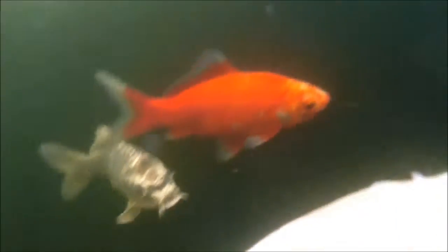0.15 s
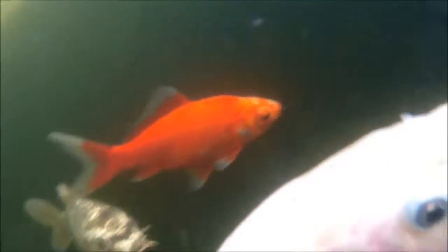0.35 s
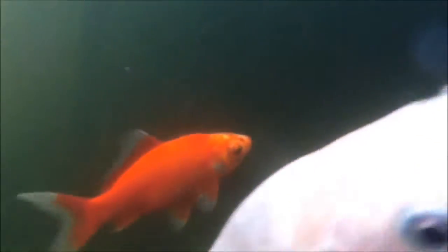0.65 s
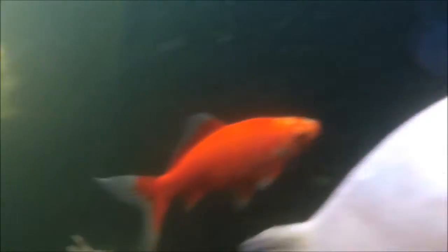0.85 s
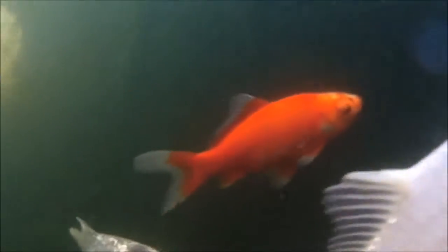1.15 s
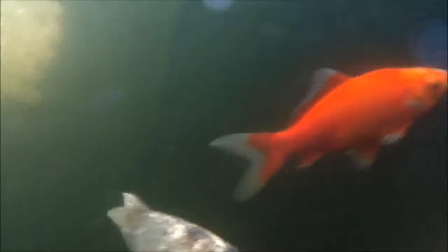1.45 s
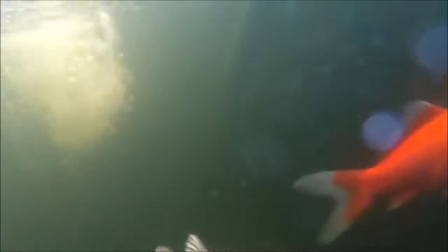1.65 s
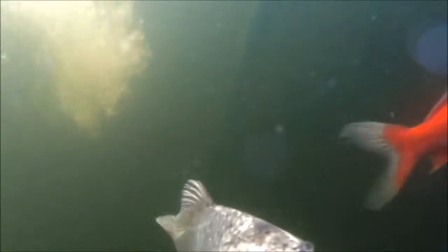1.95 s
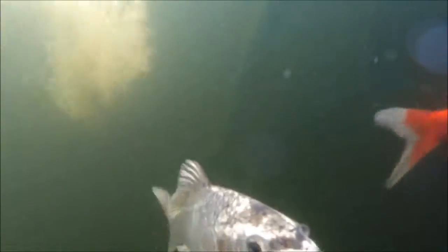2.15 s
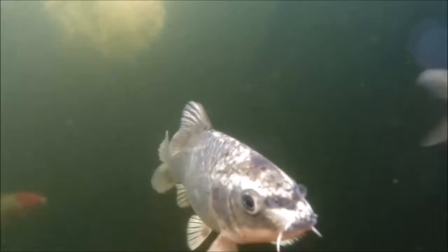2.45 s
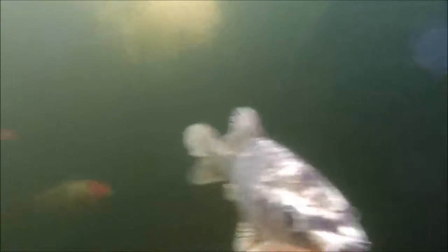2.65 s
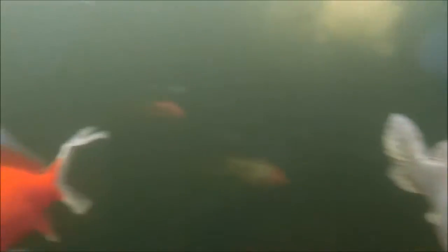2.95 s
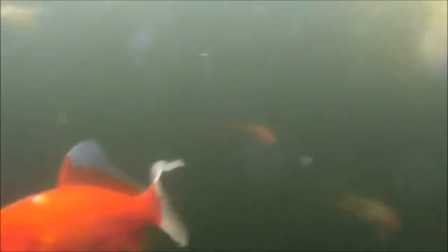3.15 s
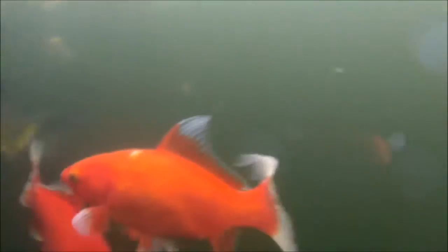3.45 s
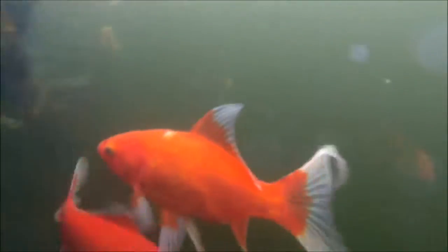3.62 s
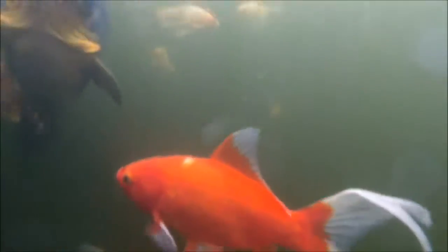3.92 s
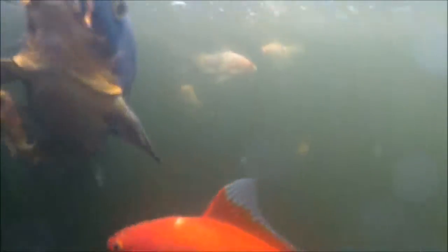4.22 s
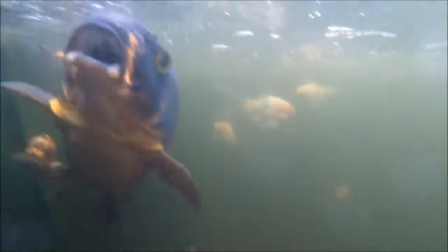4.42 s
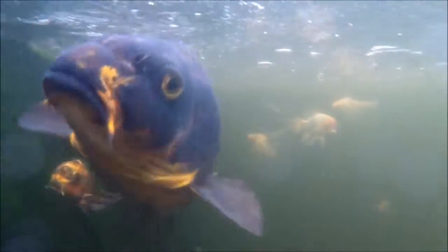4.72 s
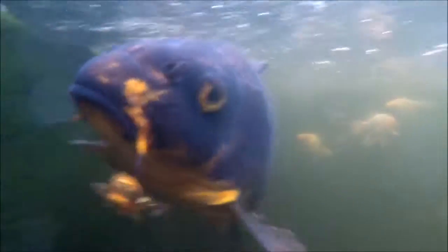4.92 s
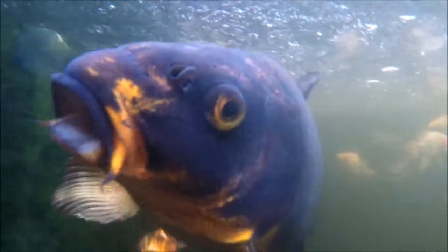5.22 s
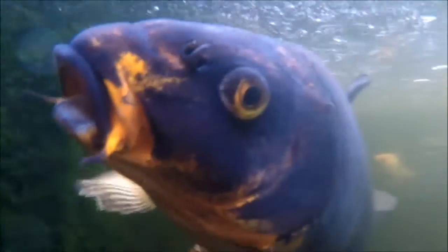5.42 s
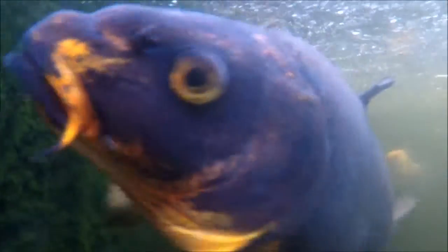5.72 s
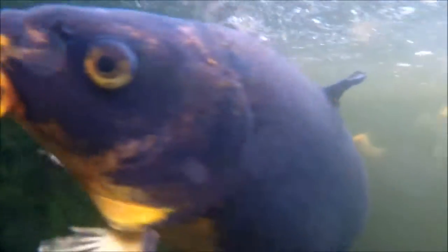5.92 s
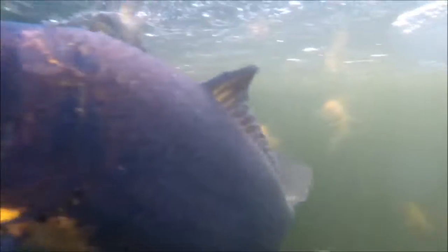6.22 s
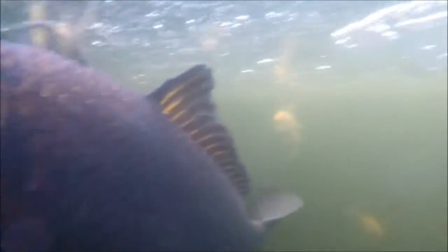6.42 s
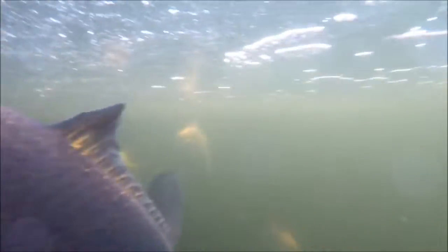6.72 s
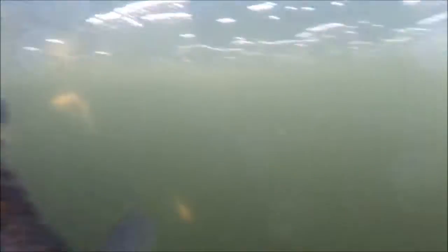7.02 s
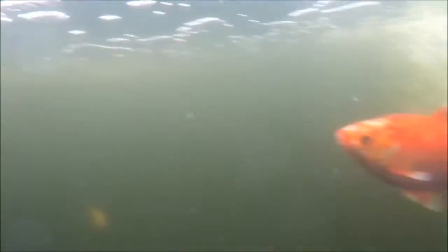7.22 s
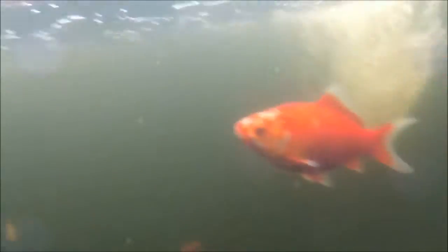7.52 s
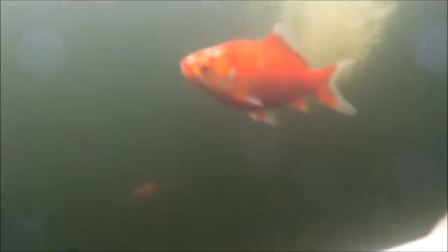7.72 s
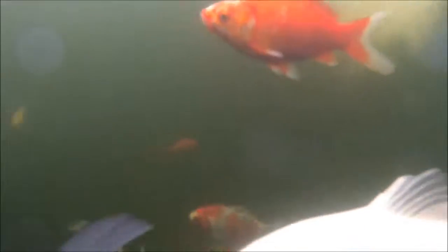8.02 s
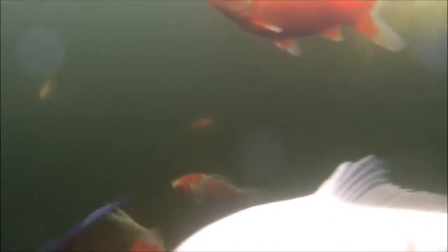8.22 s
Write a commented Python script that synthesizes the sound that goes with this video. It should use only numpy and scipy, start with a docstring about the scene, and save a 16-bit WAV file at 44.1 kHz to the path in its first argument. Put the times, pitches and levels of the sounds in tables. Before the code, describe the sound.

Under a garden pond's surface, a microphone sealed in a drifting waterproof case picks up deep, uneven water rumble and a steady low pump hum. Faint glassy trickling, fizz and gurgle grow toward the middle. Dull knocks, low glugs, tiny ticks and single bubble pings come irregularly. Around seven seconds the case is shoved, rubbed and bumped, with a lesser scrape soon after, then it calms.

```python
"""Water rumbles on a waterproof housing over a low pump hum and hiss, with trickle, fizz, gurgle and crackle.
The place is under the surface of a garden pond; the camera's one microphone drifts inside the housing.
Shaped noise makes the rumble and hiss, sines the hum and whine, random impulses through resonators the inflow.
Close by, damped sines make knocks, low glugs and bubble pings; noise bursts make ticks and rubs; a few blows
bump the case."""
import sys
import numpy as np
from scipy import signal
from scipy.fft import rfft, irfft
from scipy.io import wavfile
from scipy.ndimage import uniform_filter1d

SR = 44100
rng = np.random.default_rng(int(sys.argv[2]) if len(sys.argv) > 2 else 0)


def inscribe(sig):
    """Save sig as 16-bit PCM at rate SR to the path in sys.argv[1].

    A 1-D sig is mono; a 2-D sig holds one channel per row.
    Samples are clipped to [-1, 1] before scaling.
    """
    pcm = np.round(np.clip(np.atleast_2d(sig).T, -1, 1) * 32767)
    wavfile.write(sys.argv[1], SR, pcm.astype(np.int16))


N = 368676

# The pump hum as the camera drifts. Each row: time in seconds, level in dB before flutter.
PUMP_LEVEL = [(0, -40), (0.75, -43), (1.1, -41), (2.3, -37), (3.9, -38.0), (5.0, -40.5), (6.6, -38.5),
              (8.36, -40)]
PUMP_HZ, PUMP_WANDER_HZ, PUMP_FLUTTER_DB = 122.47, 0.094, 0.47

# How hard moving water pushes on the case. Each row: time in seconds, push in dB.
WATER_PUSH = [(0, -29.5), (0.4, -33), (0.85, -25.5), (1.15, -33.5), (1.5, -30), (2.15, -35.5), (2.4, -29.5),
              (2.85, -34), (4.4, -35.5), (4.75, -39), (5.3, -36.5), (6.8, -34), (7.15, -29.5),
              (7.45, -35.5), (7.7, -31), (8.0, -35.5), (8.36, -39)]
# Colour of the rumble. Each row: frequency in Hz, level in dB.
RUMBLE_COLOUR = [(10, -4.5), (22, 8.5), (35, 4), (55, -3), (80, -10.5), (110, -11.5), (170, -21),
                 (260, -48), (500, -77)]
# The case shoved through the water. Each row: middle in seconds, length in seconds, level in dB, pitch in Hz.
SHOVES = [(0.885, 0.18, -26, 38), (5.423, 0.037, -27, 60), (7.227, 0.29, -22, 23),
          (7.258, 0.027, -13, 51.7), (7.637, 0.069, -26.5, 44.5)]
EDDY_DB, EDDY_LUMPS_DB = -2, 1.63   # rumble relative to the push; spread of its random swing

# Inflow, stronger as the camera nears it; only differences count. Each row: time in seconds, strength in dB.
INFLOW_STRENGTH = [(0, -56.5), (0.8, -61), (1.8, -51.5), (3.0, -50.5), (5.0, -49.0), (6.2, -48.0),
                   (7.0, -49), (7.5, -50.5), (8.36, -56)]
# How hard the bubbles churn. Each row: time in seconds, churn in dB.
CHURN_STRENGTH = [(0, -54.5), (0.8, -57), (2.6, -53.5), (3.1, -51), (3.7, -51.5), (4.2, -48), (4.9, -51),
                  (7.0, -50.5), (8.36, -56.0)]
# Housing resonances. Each row: frequency in Hz, width in Hz, relative level in dB.
HOUSING_MODES = [(1517, 57, -2.5), (1809, 32, -5), (1793, 91, -15), (1900, 19, -11), (2330, 10.3, 7.5),
                 (2474, 29, -8.5), (2696, 60, -4), (3426, 174, -14), (3918, 43, -11)]
# Bubble splatter close to the inflow. Each row: frequency in Hz, level in dB.
SPLATTER_COLOUR = [(1480, -6.5), (1700, 3), (1850, 1), (2100, -0.5), (2350, 9.5), (2600, -3.5), (2820, 4)]
TRICKLE_DB, TRICKLE_FOLLOWS = -46.5, 1.42   # base level at the nearest point; dB per dB of inflow
SPLATTER_RANGE_DB = 10   # splatter is heard within this much of the nearest point
FAR_TILT_DB_PER_OCTAVE = 3.5   # the trickle thins with distance

# Bubble swarms. Each row: frequency in Hz, level in dB.
FIZZ_COLOUR = [(2500, 16.5), (3300, -26.5), (4400, -6), (5500, 2), (6500, -2.5), (7200, -8.5), (9000, -6),
               (10500, -26), (13000, -14), (15000, -31)]
# The finest fizz. Each row: frequency in Hz, level in dB.
FINE_FIZZ_COLOUR = [(7200, -1), (7800, 1), (8700, -9), (10200, -7)]
FIZZ_DB, FIZZ_FOLLOWS = -58.5, 0.79   # base level at the strongest churn; dB per dB of churn
FINE_FIZZ_DB, FINE_FIZZ_FADE_DB_PER_S = -70.5, 1.3   # level at the start; fade as the camera drifts on

# Large bubbles. Each row: frequency in Hz, level in dB.
GURGLE_COLOUR = [(190, 0.5), (280, 1.5), (400, -2.5), (550, -5), (800, -10), (1200, -51)]
GURGLE_DB, GULP_DB, GULPS_PER_S = -5, -9, 14   # levels relative to the churn

# Surface crackle. Each row: band centre in Hz, relative level in dB.
CRACKLE_BANDS = [(4200, -1.5), (5800, -4.0), (8000, -2.0), (11000, -11.5)]

# Colour of the background hiss. Each row: frequency in Hz, level in dB.
HISS_COLOUR = [(94, -62), (160, -8), (205, 0), (305, -45), (349, -9.5), (438, -13), (885, -13.5),
               (1660, -16.5), (2660, -10.5), (2930, -18), (3340, -17.5), (9690, -31), (15000, -43)]
# Faint electrical whine. Each row: frequency in Hz, rms level in dB.
WHINE_TONES = [(9450, -77.5), (9500, -81.5)]

# Knocks on the case and low glugs of big bubbles. Each row: start in seconds, peak in dB before housing ring,
# pitch in Hz.
KNOCKS_AND_GLUGS = [(0.039, -42.5, 720), (0.4735, -29.5, 289), (0.479, -29.5, 199), (1.066, -43, 290),
                    (1.3306, -38, 810), (1.506, -33.5, 725), (1.8472, -22, 834), (2.067, -26.5, 360),
                    (2.509, -40, 240), (2.76, -42, 356), (3.087, -38, 280), (3.33, -27.5, 673),
                    (4.053, -38, 380), (4.114, -41, 308), (4.170, -38.5, 407), (4.238, -38, 283),
                    (4.577, -31, 394), (4.678, -34.5, 287), (5.226, -30, 288), (5.298, -40, 390),
                    (5.628, -35.5, 260), (6.21, -37, 318), (7.0386, -29, 320)]
KNOCK_CYCLES, KNOCK_ATTACK_S, KNOCK_RING_DB = 11.4, 0.00035, 18.5   # cycles to fall 60 dB; onset; housing ring

# Rubs on the case, levels before scaling by length. Each row: start in seconds, length in seconds,
# wall ringing in dB, rasp in dB, squeak in Hz.
RUBS = [(0.065, 0.047, -56, -43.5, 970), (0.451, 0.056, -51, -49, 1900), (1.068, 0.022, -68, -54.5, 1020),
        (3.396, 0.098, -73, -54.5, 1000), (6.812, 0.05, -52.5, -52, 1180), (6.992, 0.037, -55, -53, 2410),
        (7.032, 0.027, -56, -55, 730), (7.182, 0.079, -35.5, -38.5, 2330), (7.187, 0.041, -31, -38.5, 940),
        (7.627, 0.021, -37, -44, 1390), (7.647, 0.067, -36, -45.5, 3400), (7.700, 0.011, -29, -41, 1260),
        (8.093, 0.028, -47.5, -46.5, 1810)]
# Colour of the rasp. Each row: frequency in Hz, level in dB.
RASP_COLOUR = [(100, -8), (200, 0), (700, 0), (1200, -4), (1600, -7), (2400, -4), (2750, -7), (3100, -16),
               (4300, -18), (5000, -30), (12000, -48)]
# Low resonances of the case walls. Each row: frequency in Hz, width in Hz, relative level in dB.
WALL_MODES = [(186, 200, -4.5), (297, 22, 10.5), (384, 21, 6.5), (446, 58, 5.5), (530, 10.6, 4.5),
              (718, 25, -5)]
SQUEAK_SHARE, SQUEAK_FALL_PER_OCTAVE = 0.66, 0.27   # at 1 kHz; higher squeaks stand out less

# Sharp ticks, some of them the click of a knock. Each row: start in seconds, peak in dB, centre in Hz.
TICKS = [(0.776, -40, 2290), (0.7767, -43, 5000), (.990, -47, 9400), (1.122, -44, 8000),
         (1.693, -42.5, 9900), (1.847, -37, 2210), (2.086, -38, 2500), (2.1443, -39.5, 900),
         (2.145, -35, 2320), (2.173, -43, 8000), (3.263, -40, 5740), (3.3299, -35.5, 2540),
         (4.323, -46, 7560), (4.655, -38.5, 1710), (5.053, -39.5, 7650), (5.831, -43, 10800),
         (7.077, -38.5, 7000), (7.1466, -30.5, 6400)]

# Single bubbles near the case. Each row: start in seconds, peak in dB, pitch in Hz.
BUBBLES = [(1.625, -47.5, 2120), (1.808, -46, 6400), (2.084, -45, 3530), (2.098, -43, 1520),
           (2.229, -49, 1547), (2.447, -47, 3910), (2.722, -50, 697), (2.955, -51, 2970), (2.970, -46, 484),
           (3.022, -46.5, 4120), (3.0765, -40.5, 2326), (3.455, -43, 2330), (3.485, -42, 2330),
           (3.68, -31.5, 2320), (4.654, -47, 2340), (7.246, -28.5, 2394), (7.310, -46.5, 3560)]
BUBBLE_CYCLES = 170   # cycles to fall 60 dB

# The case bumps while it is rubbed. Each row: start in seconds, peak in dB, pitch in Hz.
BUMPS = [(7.1926, -26.5, 390), (7.633, -25, 420), (7.692, -23, 485), (7.704, -30, 330)]
BUMP_WIDTH_HZ = 220   # spread of a blow round its pitch

CUTOFF_HZ = 15250


def from_db(db):
    """Decibels to gain."""
    return 10 ** (np.asarray(db) / 20)


def rms_one(x):
    """Scale to unit rms."""
    return x / np.sqrt(np.mean(x ** 2) + 1e-20)


def in_time(rows):
    """Each column of a curve at every sample."""
    s, *columns = np.transpose(rows)
    return [np.interp(np.arange(N) / SR, s, column) for column in columns]


def at_hz(points, hz):
    """Gain of a spectrum at given frequencies, interpolated along log frequency."""
    known_hz, db = np.transpose(points)
    return from_db(np.interp(np.log(hz + 1e-3), np.log(known_hz), db))


def drift(rate):
    """Slow random wander of rms 1; a higher rate in Hz wanders faster."""
    # made at one fortieth of the sample rate, then interpolated
    r = np.exp(-80 * np.pi * rate / SR)
    chance = rng.standard_normal(N // 40 + 2002)
    slow = signal.lfilter([1], [1, -2 * r, r * r], chance)[2000:]
    return np.interp(np.arange(N) / 40, np.arange(len(slow)), rms_one(slow))


def coloured(x, spectrum):
    """Give a sound a colour; rms 1."""
    gain = at_hz(spectrum, np.fft.rfftfreq(len(x), 1 / SR))
    return rms_one(irfft(rfft(x) * gain, len(x)))


def noise(spectrum):
    """Steady noise of a given colour, rms 1."""
    return coloured(rng.standard_normal(N), spectrum)


def resonance(x, hz, width):
    """Two-pole band-pass with gain 1 on top."""
    r = np.exp(-np.pi * width / SR)
    w = 2 * np.pi * min(hz, .45 * SR) / SR
    return signal.lfilter(np.array([1, 0, -1]) * (1 - r * r) / 2, [1, -2 * r * np.cos(w), r * r], x + 1e-18)


def body(x, modes):
    """Resonances in parallel, with alternating sign."""
    return sum((-1) ** k * from_db(db) * resonance(x, hz, width) for k, (hz, width, db) in enumerate(modes))


def low_pass(x, hz, order=2):
    """Butterworth low-pass."""
    return signal.sosfilt(signal.butter(order, min(hz, .45 * SR), fs=SR, output="sos"), x)


def add(out, s, sound):
    """Mix a sound in at a time in seconds."""
    at = max(round(s * SR), 0)
    out[at:at + len(sound)] += sound[:max(N - at, 0)]


def grains(per_s, spread_db):
    """Random impulses of either sign, most small and a few large."""
    sizes = from_db(spread_db * np.minimum(rng.exponential(1, N), 5))
    return (rng.random(N) < per_s / SR) * sizes * rng.choice([-1, 1], N)


def bubble_cloud(impulses, spectrum, q, count=36):
    """Each impulse rings one bubble size out of many; rms 1."""
    pitches = np.geomspace(spectrum[0][0], spectrum[-1][0], count)
    dealt = rng.integers(0, count, N)
    cloud = np.zeros(N)
    for k, hz in enumerate(pitches):
        cloud += at_hz(spectrum, hz) * resonance(impulses * (dealt == k), hz, hz / q)
    return rms_one(cloud)


def damped(hz, t60, attack_s):
    """A sine that swells quickly and dies away by 60 dB in t60 seconds; peak 1."""
    t = np.arange(SR // 4) / SR
    wave = np.sin(2 * np.pi * hz * t) * from_db(-60 * t / t60) * (1 - np.exp(-t / attack_s))
    return wave / np.abs(wave).max()


def pump():
    """One low motor tone, slightly unsteady in pitch and level."""
    hum_db, = in_time(PUMP_LEVEL)
    phase = 2 * np.pi * np.cumsum(PUMP_HZ + PUMP_WANDER_HZ * drift(1.2)) / SR
    return from_db(hum_db + PUMP_FLUTTER_DB * drift(4.9)) * np.sin(phase)


def sway():
    """Pressure of the water moving round the case, low noise with a few strong shoves."""
    push_db, = in_time(WATER_PUSH)
    eddies = noise(RUMBLE_COLOUR)
    # even out the noise so that the push sets its level
    eddies = eddies / np.sqrt(uniform_filter1d(eddies ** 2, size=SR // 8))
    out = eddies * from_db(push_db + EDDY_DB + EDDY_LUMPS_DB * drift(6))
    for s, length, db, hz in SHOVES:
        t = np.linspace(-length / 2, length / 2, int(length * SR))
        add(out, s - length / 2, from_db(db) * np.hanning(len(t)) * np.sin(2 * np.pi * hz * t))
    return out


def inflow():
    """Water returning to the pond trickles, fizzes and gurgles."""
    inflow_db, = in_time(INFLOW_STRENGTH)
    churn_db, = in_time(CHURN_STRENGTH)
    return trickle(inflow_db - inflow_db.max()) + fizz(churn_db) + gurgle(churn_db)


def trickle(near_db):
    """Falling water rings the housing, louder and fuller close to the inflow."""
    nearness = np.clip(1 + near_db / SPLATTER_RANGE_DB, 0, 1)
    drops = grains(per_s=1500, spread_db=3.5)
    ringing = np.zeros(N)
    for k, (hz, width, db) in enumerate(HOUSING_MODES):
        # each resonance swells by itself; far off, the high ones lead
        far_tilt_db = FAR_TILT_DB_PER_OCTAVE * (1 - nearness) * np.log2(hz / 2000)
        mode_gain = from_db(db + 1.85 * drift(6.7) + far_tilt_db)
        ringing += mode_gain * resonance((-1) ** k * drops, hz, width)
    ringing = rms_one(ringing)
    # close to the inflow, single bubble notes fill in between the resonances
    splatter = bubble_cloud(grains(per_s=1300, spread_db=4.5), SPLATTER_COLOUR, q=165, count=40)
    level = from_db(TRICKLE_DB + TRICKLE_FOLLOWS * near_db + 1.0 * drift(28))
    return level * (ringing * (1 - 0.72 * nearness) + 0.54 * nearness * splatter)


def fizz(churn_db):
    """Tiny bubbles ring in swarms as the water churns, over a thin fizz of the very finest."""
    swarm = bubble_cloud(grains(per_s=3300, spread_db=3.5), FIZZ_COLOUR, q=127, count=80)
    fine = bubble_cloud(grains(per_s=590, spread_db=4.0), FINE_FIZZ_COLOUR, q=110, count=20)
    swarm_db = FIZZ_DB + FIZZ_FOLLOWS * (churn_db - churn_db.max()) + 2.2 * drift(15.5)
    fine_db = FINE_FIZZ_DB - FINE_FIZZ_FADE_DB_PER_S * np.arange(N) / SR
    return from_db(swarm_db) * swarm + from_db(fine_db) * fine


def gurgle(churn_db):
    """Large bubbles murmur, with short separate gulps at random moments."""
    murmur = bubble_cloud(grains(per_s=420, spread_db=2.5), GURGLE_COLOUR, q=26.6)
    gulps = bubble_cloud(grains(per_s=GULPS_PER_S, spread_db=1.6), GURGLE_COLOUR[1:4], q=8.4, count=12)
    return from_db(churn_db) * (from_db(GURGLE_DB) * murmur + from_db(GULP_DB) * gulps)


def crackle():
    """Tiny bubbles burst at the surface, each a short noise spray in a band of its own."""
    out = np.zeros(N)
    fade = from_db(-60 / (0.062 * SR))   # each spray falls 60 dB in 62 ms
    for hz, db in CRACKLE_BANDS:
        bursts = signal.lfilter([1], [1, -fade], np.abs(grains(per_s=11, spread_db=0.5)) + 1e-18)
        spray = bursts * rng.standard_normal(N)
        band = resonance(resonance(spray, hz, 0.37 * hz), hz, 0.37 * hz)
        out += from_db(db) * rms_one(band)
    return from_db(-70.5) * out


def background():
    """An even hiss of coloured noise and the camera's thin whine of steady sines."""
    t = np.arange(N) / SR
    whine = sum(np.sqrt(2) * from_db(db) * np.sin(2 * np.pi * hz * t) for hz, db in WHINE_TONES)
    return from_db(-59.0) * noise(HISS_COLOUR) + whine


def knocks_and_glugs():
    """A short dull note for each knock or big bubble, shorter the higher it is, with the housing's ring."""
    out = np.zeros(N)
    for s, db, hz in KNOCKS_AND_GLUGS:
        add(out, s, from_db(db) * damped(hz, KNOCK_CYCLES / hz, attack_s=KNOCK_ATTACK_S))
    return out + from_db(KNOCK_RING_DB) * body(out, HOUSING_MODES)


def rubs():
    """Dense slips rasp on the case and set its walls ringing on after the touch."""
    out, t = np.zeros(N), np.arange(SR // 4) / SR
    for s, length, walls_db, rasp_db, hz in RUBS:
        # pressure rises and falls over the touch
        pressure = np.sqrt(np.clip(4 * t / length * (1 - t / length), 0, 1))
        slips = rng.standard_normal(len(t)) * (rng.random(len(t)) < 2200 / SR)
        rasp = rms_one(pressure * coloured(slips, RASP_COLOUR))
        # part of the slipping gathers round one pitch
        squeak = np.clip(SQUEAK_SHARE - SQUEAK_FALL_PER_OCTAVE * np.log2(hz / 1000), 0, 1)
        rasp = (1 - squeak) * rasp + squeak * rms_one(resonance(rasp, hz, hz / 4))
        rasp = rms_one(rasp + 0.35 * body(rasp, HOUSING_MODES))
        walls = rms_one(body(pressure * slips, WALL_MODES))
        walls = low_pass(walls, 900)
        # the energy of a rub grows with its length
        touch = from_db(walls_db) * walls + from_db(rasp_db) * rasp
        add(out, s, np.sqrt(length / t[-1]) * touch)
    return out


def ticks():
    """A sharp crack with a short scattered noise tail, narrowed to a band."""
    out, t = np.zeros(N), np.arange(SR // 20) / SR
    tail = from_db(-60 * t / .05)
    for s, db, hz in TICKS:
        crack = (t == 0) + 0.13 * rng.standard_normal(len(t)) * tail
        tick = resonance(resonance(crack, hz, hz / 2), hz, hz / 2)
        add(out, s, from_db(db) * tick / np.abs(tick).max())
    return out


def bubbles():
    """Single bubbles ring at the pitch of their size, swelling over about two cycles; large ones ring longer."""
    out = np.zeros(N)
    for s, db, hz in BUBBLES:
        add(out, s, from_db(db) * damped(hz, BUBBLE_CYCLES / hz, attack_s=2 / hz))
    return out


def bumps():
    """A soft blow sets the wall resonances ringing, each with a random strength of its own."""
    out = np.zeros(N)
    for s, db, pitch in BUMPS:
        blow = resonance(signal.unit_impulse(SR // 4), pitch, BUMP_WIDTH_HZ)
        modes = [(hz, width, level + 1.5 * rng.standard_normal()) for hz, width, level in WALL_MODES]
        ring = body(blow, modes)
        add(out, s, from_db(db) * ring / np.abs(ring).max())
    return out


def scene():
    """Everything reaches one microphone inside the housing."""
    water = pump() + sway() + inflow() + crackle()
    close_by = knocks_and_glugs() + rubs() + ticks() + bubbles() + bumps()
    return (water + background() + close_by)[None]


def record(dry):
    """A steep elliptic low-pass removes the top above the cutoff."""
    return signal.sosfilt(signal.ellip(10, .1, 80, CUTOFF_HZ, fs=SR, output="sos"), dry)


dry = scene()
out = record(dry)
inscribe(out)
```